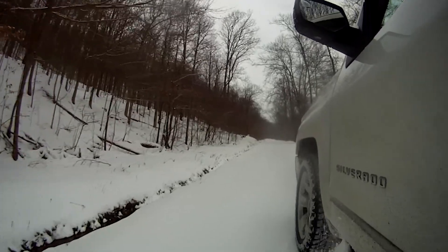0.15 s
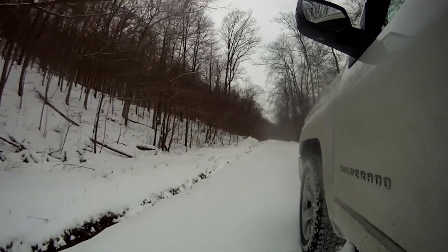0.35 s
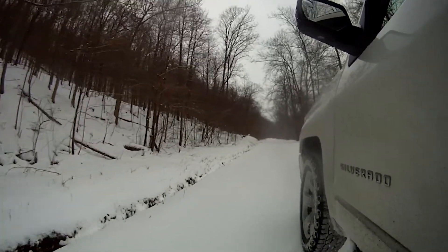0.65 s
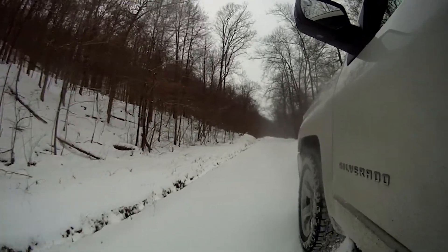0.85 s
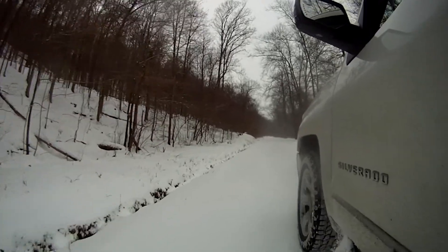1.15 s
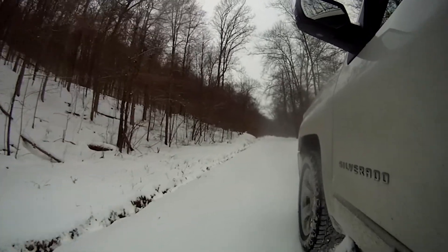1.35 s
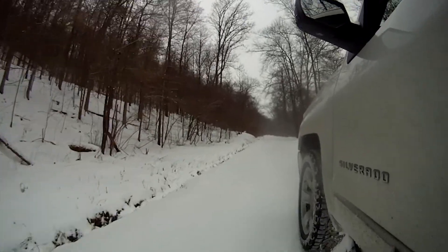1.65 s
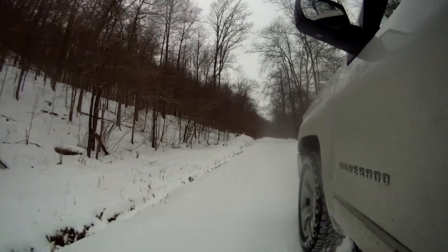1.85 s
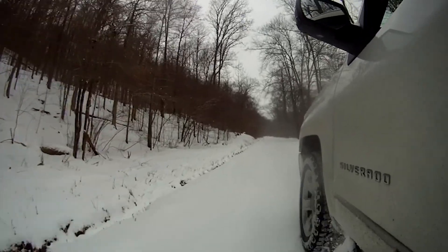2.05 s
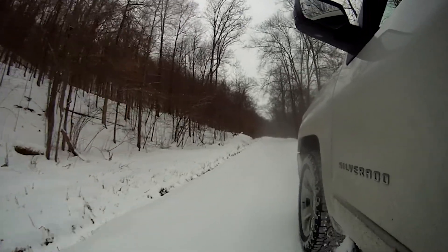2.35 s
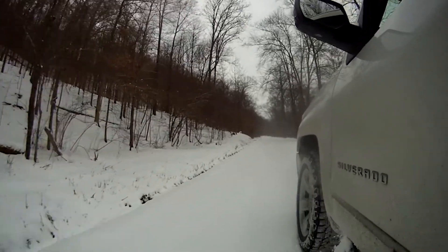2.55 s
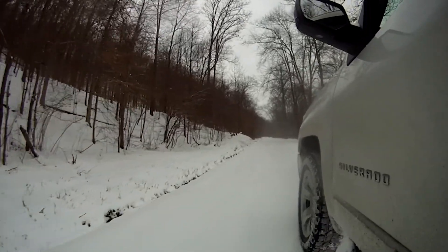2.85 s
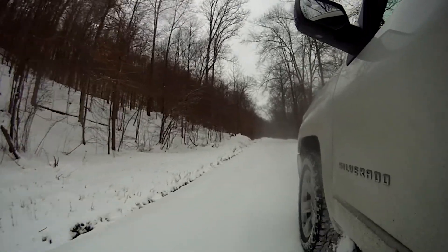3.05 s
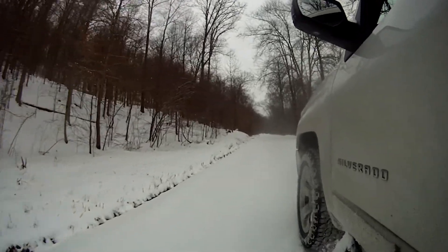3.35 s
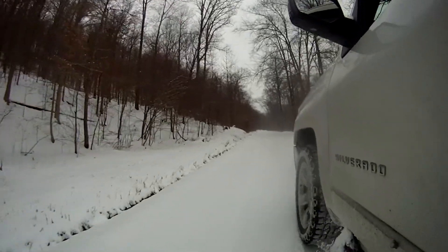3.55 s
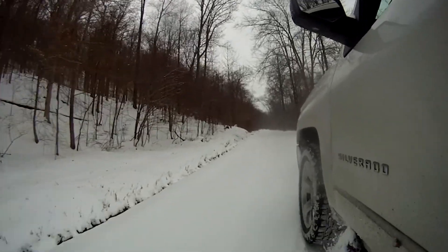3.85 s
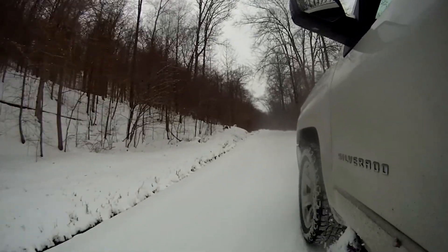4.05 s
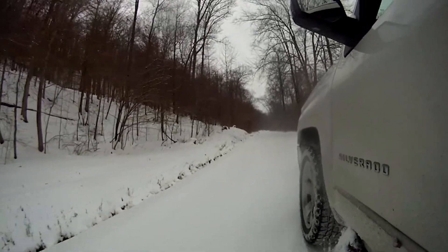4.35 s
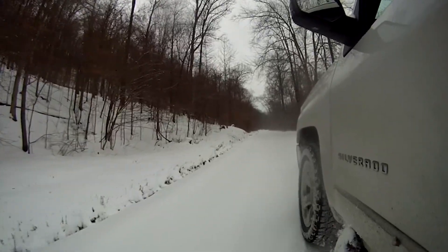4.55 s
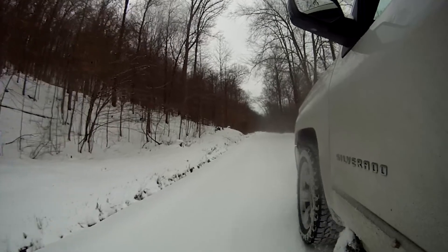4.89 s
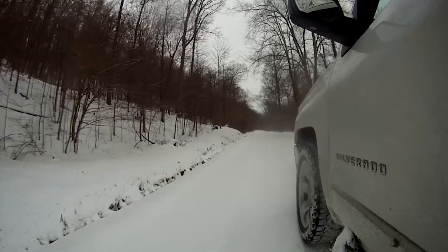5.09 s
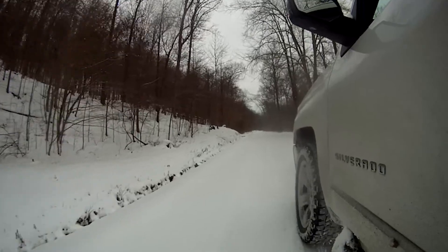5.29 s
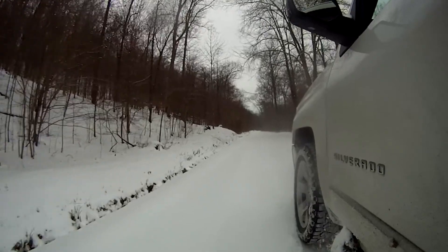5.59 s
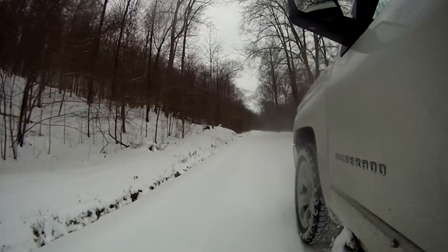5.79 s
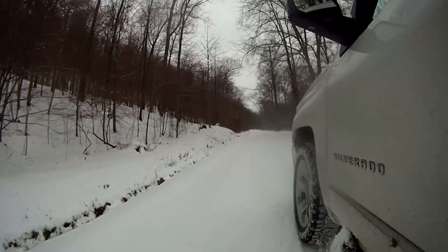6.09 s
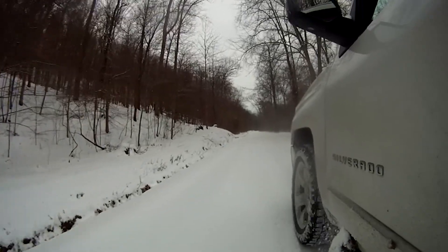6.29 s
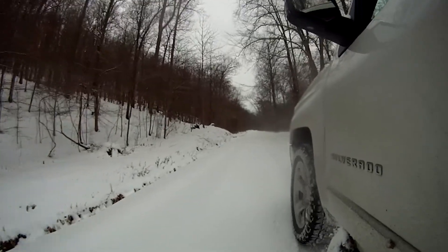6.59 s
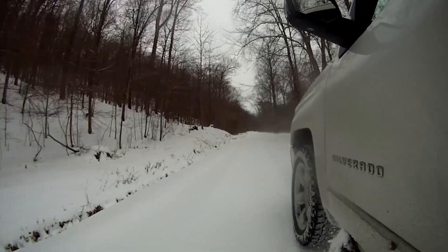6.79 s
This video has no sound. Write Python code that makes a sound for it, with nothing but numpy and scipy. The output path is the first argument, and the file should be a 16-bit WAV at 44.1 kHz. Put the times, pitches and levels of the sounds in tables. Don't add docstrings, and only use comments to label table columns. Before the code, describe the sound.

Muffled rumbling of a truck wheel on a snowy road, with soft wind slaps and jolts, then a sudden burst of heavy wind buffeting.

```python
import sys
import numpy as np
from scipy import signal
from scipy.fft import rfft, irfft, next_fast_len
from scipy.io import wavfile
from scipy.ndimage import uniform_filter1d

SR = 44100
rng = np.random.default_rng(int(sys.argv[2]) if len(sys.argv) > 2 else 0)


def int16_out(signal):
    q = np.round(np.clip(np.atleast_2d(signal).T, -1, 1) * 32767)
    wavfile.write(sys.argv[1], SR, q.astype(np.int16))


def makeup_ratio(level_db):
    decades = np.asarray(level_db, float) / 20
    return 10 ** decades


N = 305613

# time [s], roar level [dB], whistle pitch [Hz].
GUST_ROWS = [
    (6.0, -65, 1006),
    (6.3, -50.5, 1110),
    (6.45, -51.5, 1250),
    (6.52, -48.5, 1480),
    (6.7, -43, 1480),
    (6.77, -44, 1797),
    (6.83, -40, 1900),
    (6.87, -46.5, 1500),
    (6.93, -45, 1367),
]


def rms_one(x):
    return x / np.sqrt(np.mean(x ** 2) + 1e-20)


def in_time(rows):
    s, *columns = np.transpose(rows)
    return [np.interp(np.arange(N) / SR, s, c) for c in columns]


def drift(rate_hz):
    step = 20
    r = np.exp(-2 * np.pi * rate_hz * step / SR)
    noise = rng.standard_normal(N // step + 2002)
    slow = signal.lfilter([1], [1, -2 * r, r * r], noise)[2000:]
    return np.interp(np.arange(N) / step, np.arange(len(slow)), rms_one(slow))


def band(x, low_hz, high_hz):
    return signal.sosfilt(signal.butter(2, [low_hz, high_hz], "band", fs=SR, output="sos"), x)


def coloured(x, spectrum):
    size = next_fast_len(N)
    hz = np.maximum(np.arange(size // 2 + 1) * SR / size, 1)
    points = np.array(spectrum)
    gain_db = np.interp(np.log(hz), np.log(points[:, 0]), points[:, 1], left=-60, right=-120)
    return rms_one(irfft(rfft(x, size) * makeup_ratio(gain_db), size)[:N])


def resonate(x, modes):
    out = x.copy()
    for hz, width_hz, level_db in modes:
        r = np.exp(-np.pi * width_hz / SR)
        zeros = (1 - r * r) / 2 * np.array([1, 0, -1])
        poles = [1, -2 * r * np.cos(2 * np.pi * hz / SR), r * r]
        out += makeup_ratio(level_db) * signal.lfilter(zeros, poles, x)
    return out


def even(x, window_s):
    window = round(window_s * SR)
    power = uniform_filter1d(uniform_filter1d(x ** 2, window), window)
    return rms_one(x / np.sqrt(power + 1e-9))


def wind_db():
    # time [s], strength [dB].
    strength = [(0.0, -28.5), (0.25, -32), (1.19, -31), (1.68, -25.5), (1.85, -31.5), (3.82, -35),
                (4.07, -26), (4.21, -34), (4.53, -28.5), (5.88, -30.5), (6.06, -26), (6.08, -27),
                (6.12, -27), (6.44, -25.5), (6.46, -19.5), (6.87, -20.5), (6.89, -21.5), (6.93, -20)]
    calm_db = -31
    return in_time(strength)[0] - calm_db


def wind(lump_db, suck, buffet_db, rush_db):
    # frequency [Hz], density [dB per Hz].
    buffet_spectrum = [(12, -48), (20, -14), (47, -4.5), (75, -0.5), (114, -3.5), (240, -11), (309, -16),
                       (404, -19), (468, -29.5), (700, -46), (910, -64), (1540, -120)]
    buffet_follows, rush_follows = 1.106, 0.51
    thinning_per_db = 0.033
    strength_db = wind_db()

    lumps_db = lump_db * (0.18 * drift(17.0) + 1.25 * drift(55))
    low = rms_one(coloured(rng.standard_normal(N), buffet_spectrum) * makeup_ratio(lumps_db))
    low = even(band(low - suck * low ** 2, 45, 900), window_s=0.12)
    deep = signal.sosfiltfilt(signal.butter(2, 90, fs=SR, output="sos"), low)
    low = low - np.clip(thinning_per_db * strength_db, 0, 1) * deep

    rush = band(rng.standard_normal(N), 243, 595) * makeup_ratio(0.8 * lumps_db)
    rush = even(rush, window_s=0.074)

    low_gain = makeup_ratio(buffet_follows * strength_db + buffet_db)
    rush_gain = makeup_ratio(rush_follows * strength_db + rush_db)
    port = signal.butter(4, 900, fs=SR, output="sos")
    return signal.sosfilt(port, low_gain * low + rush_gain * rush)


def small_slaps(count):
    level_db, pitch_hz, length_cycles = -22, 125, 0.6
    follows = 0.3
    draw = rng.random((count, 4))
    s = (np.arange(count) + draw[:, 0]) * N / SR / count
    peak_db = level_db + follows * wind_db()[(s * SR).astype(int)] + 5 * (draw[:, 1] - 0.5)
    hz = pitch_hz * 2 ** (draw[:, 2] - 0.5)
    cycles = length_cycles * (0.5 + draw[:, 3])
    return list(zip(s, peak_db, hz, cycles))


def slaps(level_db):
    # time [s], peak [dB], pitch [Hz], length [cycles].
    large_eddies = [(0.071, -17, 81, 0.6), (0.352, -13.5, 115, 0.38), (0.517, -16, 164, 0.37),
                    (0.746, -15, 93.5, 0.5), (0.802, -15.5, 211, 0.31), (0.953, -17.5, 193, 0.83),
                    (1.332, -13, 180, 0.49), (1.595, -15.5, 111, 0.73), (1.686, -12.5, 173, 0.41),
                    (1.783, -11, 77, 0.17), (2.307, -16, 112, 0.56), (3.101, -14.5, 140, 0.34),
                    (4.05, -12.5, 108, 0.21), (4.462, -11.5, 151, 0.37), (4.903, -14, 180, 0.87),
                    (5.336, -18, 131, 0.4), (6.074, -6.5, 155, 0.47), (6.088, -9.5, 133, 0.63),
                    (6.267, -10, 131, 0.45), (6.479, -13, 169, 0.95), (6.511, -8, 127, 0.5),
                    (6.544, -6, 163, 0.41), (6.613, -8.5, 171, 0.54), (6.665, -4, 168, 0.53),
                    (6.698, -6.5, 137, 0.63), (6.724, -7, 110, 1), (6.773, -8.5, 148, 0.63),
                    (6.83, -6, 172, 0.46), (6.865, -3.5, 220, 0.24), (6.92, -9, 171, 0.81)]
    half = 1500
    t = np.arange(-half, half) / SR
    out = np.zeros((2, N + 4000))
    for s, peak_db, hz, cycles in [*large_eddies, *small_slaps(count=30)]:
        shape = np.exp(-(t * hz / max(cycles, 0.2)) ** 2)
        dip = -makeup_ratio(peak_db + level_db) * np.cos(2 * np.pi * hz * t) * shape
        start = round(s * SR)
        out[:, start:start + len(t)] += [dip, shape]
    dips, cover = out[:, half:half + N]
    dips = signal.sosfilt(signal.butter(1, 25, "high", fs=SR, output="sos"), dips)
    return dips, np.tanh(1.5 * cover)


def gust(width_hz, flutter_db):
    roar_db, whistle_hz = in_time(GUST_ROWS)
    whistle_db = -58 + 0.48 * (roar_db + 50)
    roar = rms_one(band(band(rng.standard_normal(N), 600, 1140), 600, 1140))
    narrow = signal.butter(2, width_hz, fs=SR, output="sos")
    breath = signal.sosfilt(narrow, rng.standard_normal((2, N)))
    phase = 2 * np.pi * np.cumsum(whistle_hz) / SR
    whistle = rms_one(breath[0] * np.cos(phase) + breath[1] * np.sin(phase))
    return makeup_ratio(flutter_db * drift(35)) * (makeup_ratio(roar_db) * roar + makeup_ratio(whistle_db) * whistle)


def spray(low_hz, high_hz, flutter_db):
    roar_db = in_time(GUST_ROWS)[0]
    level_db = -76.5 + 1.04 * (roar_db + 48.5)
    hiss = rms_one(band(rng.standard_normal(N), low_hz, high_hz))
    return makeup_ratio(level_db + flutter_db * drift(30)) * hiss


def jolts():
    # time [s], peak [dB].
    ruts = [(0.30, -36), (1.14, -35.5), (2.07, -38), (2.35, -39), (2.61, -42), (3.47, -37), (4.05, -39),
            (4.34, -47), (5.85, -35), (6.12, -51), (6.58, -44)]
    shake_db, rise_db_per_s, fall_db_per_s = -50, 69, 61
    t = np.arange(N) / SR
    power = makeup_ratio(shake_db) ** 2
    for s, peak_db in ruts:
        slope = np.where(t < s, rise_db_per_s, fall_db_per_s)
        power = power + makeup_ratio(peak_db - slope * np.abs(t - s)) ** 2
    return np.sqrt(power)


def tyre(per_s, grain_db, crunch_db, turn_db, tread_db):
    # frequency [Hz], density [dB per Hz].
    roll_spectrum = [(14, -36), (32, -9.5), (60, -3.5), (105, -3), (230, -4.5), (310, -19), (480, -16.5),
                     (600, -29.5), (800, -27.5), (1150, -32), (1620, -40), (2700, -46), (3800, -55),
                     (5800, -61)]
    # pitch [Hz], width [Hz], level [dB].
    case_modes = [(108, 10.8, -2.5), (224, 30, -10), (516.6, 10.6, 6), (672, 58, 0), (720, 39, 0.5),
                  (940, 71, -5.5), (1087, 48, -11), (1313, 14, 0), (1456, 140, -3.5), (1715, 31, 1),
                  (2016, 83, -8), (2370, 400, -15)]
    wheel_hz, tread_hz = 2.3, 10.9
    t = np.arange(N) / SR
    level_db = -31.5 + 0.077 * wind_db()

    born = rng.random(N) < per_s * makeup_ratio(3 * drift(9)) / SR
    sizes = makeup_ratio(grain_db * np.minimum(rng.exponential(1, N), 4)) * rng.choice([-1, 1], N)
    turn_swell_db = turn_db * np.sin(2 * np.pi * wheel_hz * t)
    tread_swell_db = tread_db * np.sin(2 * np.pi * tread_hz * t + 1.1 * drift(0.88))

    push = rng.standard_normal(N) + makeup_ratio(crunch_db) * rms_one(born * sizes)
    rolling = even(resonate(coloured(push, roll_spectrum), case_modes), window_s=0.15)
    shake = rms_one(band(rng.standard_normal(N), 26, 44))
    return makeup_ratio(level_db + turn_swell_db + tread_swell_db) * rolling + jolts() * shake


def scene():
    road = tyre(per_s=900, grain_db=5.0, crunch_db=-9.5, turn_db=-0.06, tread_db=0.5)
    bed = road + wind(lump_db=2.5, suck=0.055, buffet_db=-33.5, rush_db=-47)
    edge = gust(width_hz=280, flutter_db=1.0)
    dips, cover = slaps(level_db=-3.13)
    snow = spray(low_hz=1900, high_hz=4200, flutter_db=4.0)
    low = signal.sosfiltfilt(signal.butter(2, 350, fs=SR, output="sos"), bed)
    return (bed - 0.75 * cover * low + dips + edge + snow)[None]


def top_cut(x):
    return signal.sosfilt(signal.butter(12, 15180, fs=SR, output="sos"), x)


def record(dry):
    rate_hz, edge_hz = 12000, 5250
    hiss = makeup_ratio(-66.0) * rng.standard_normal(dry.shape)
    x = signal.sosfilt(signal.cheby1(6, 0.4, edge_hz, fs=SR, output="sos"), dry + hiss)
    x = np.pad(x, ((0, 0), (0, SR // 10)))
    slow = signal.resample(x, round(x.shape[1] * rate_hz / SR), axis=1)
    held = signal.resample(np.repeat(slow, 4, axis=1), x.shape[1], axis=1)[:, :N]
    held = signal.sosfilt(signal.butter(12, 15200, fs=SR, output="sos"), held)
    return top_cut(held)


dry = scene()
out = record(dry)
int16_out(out)
```